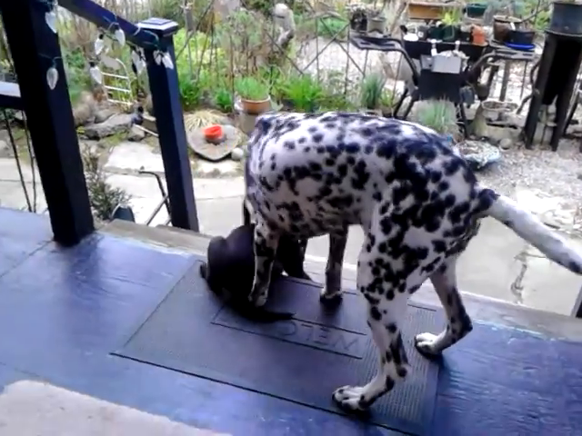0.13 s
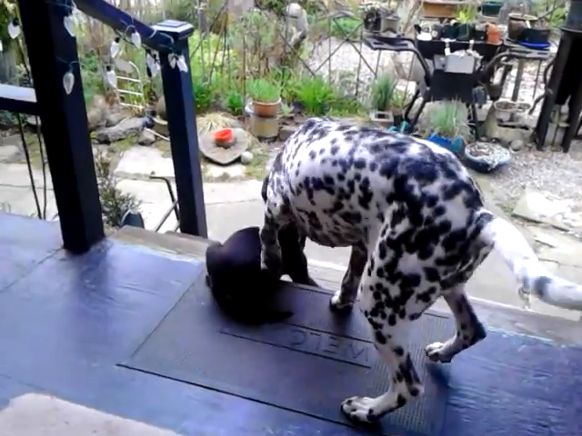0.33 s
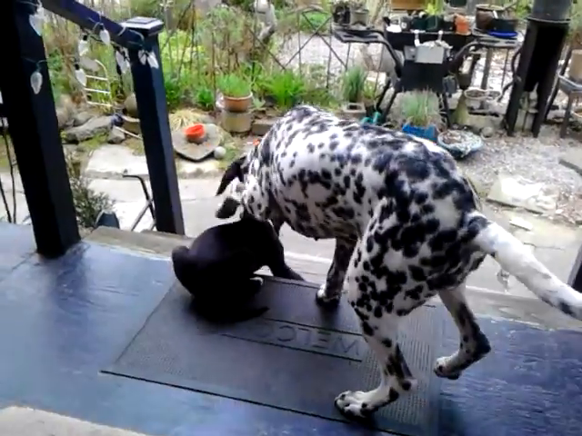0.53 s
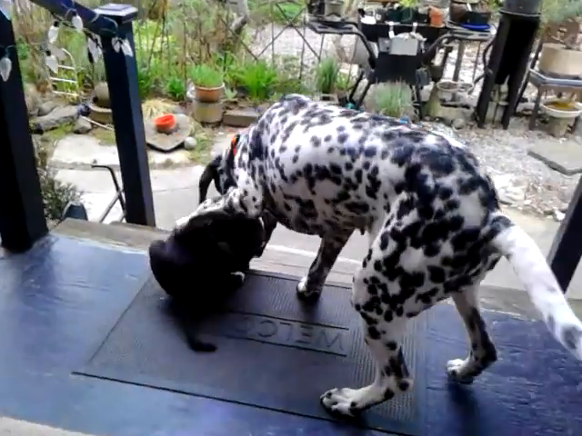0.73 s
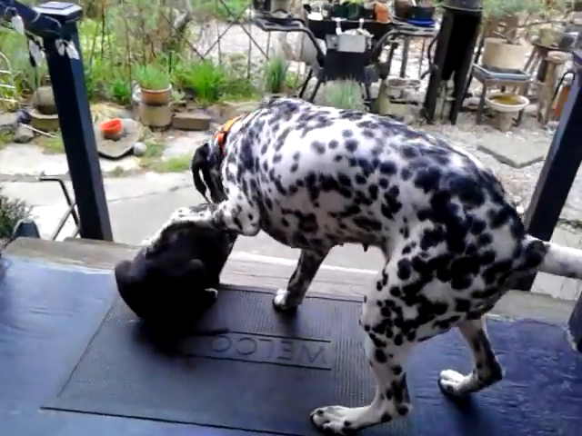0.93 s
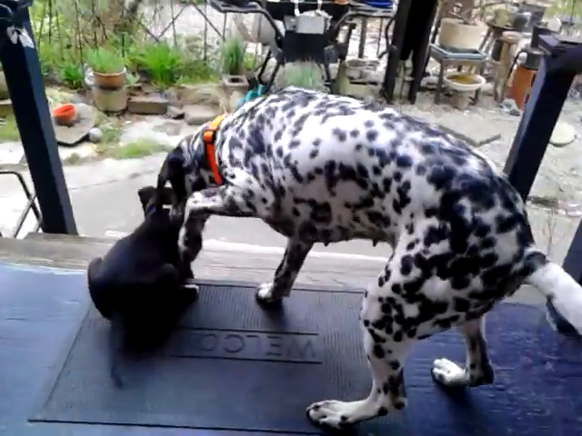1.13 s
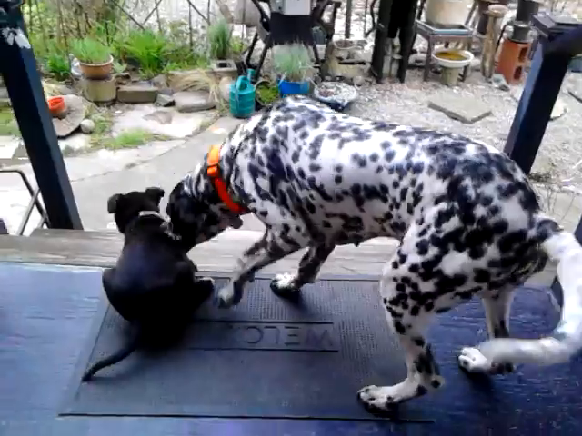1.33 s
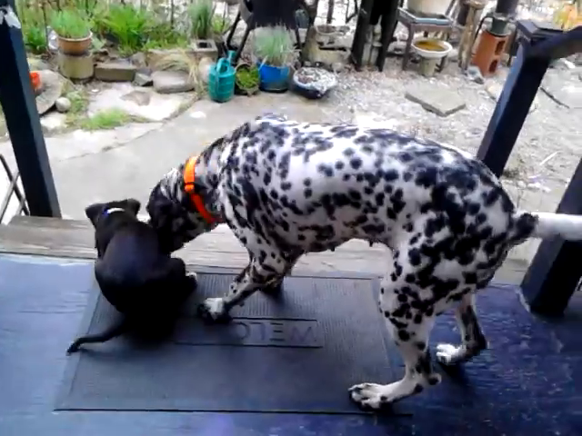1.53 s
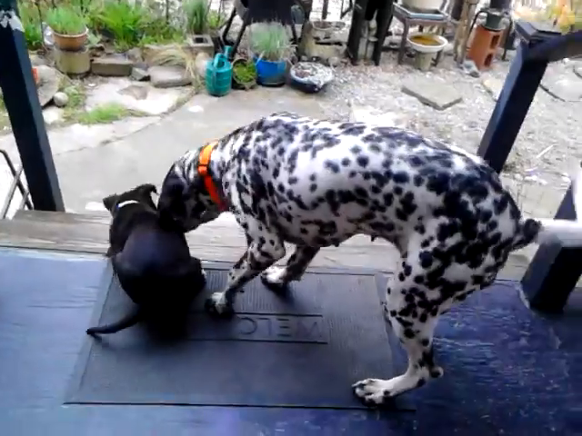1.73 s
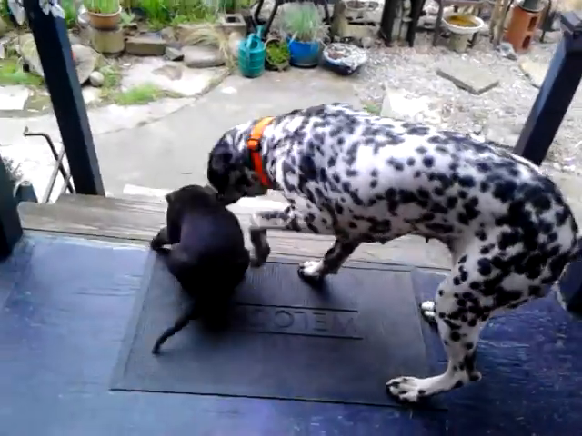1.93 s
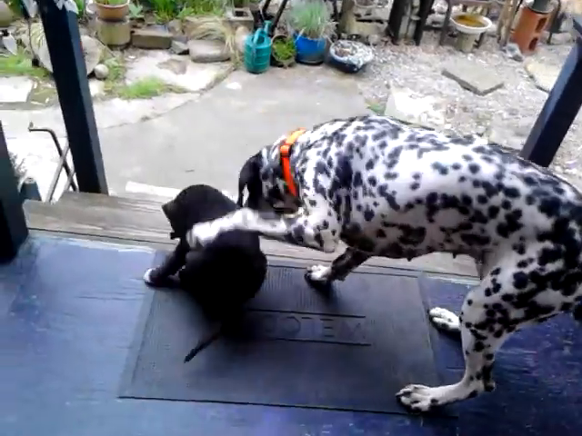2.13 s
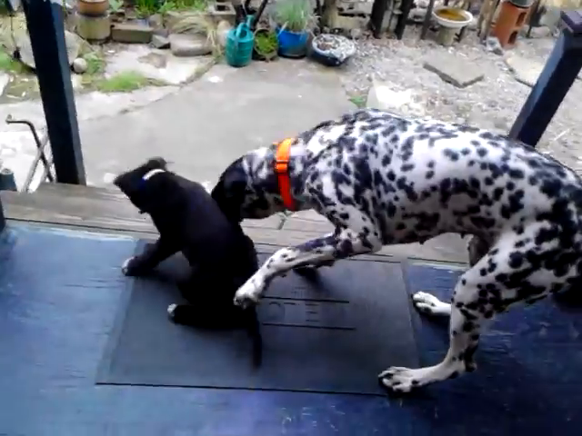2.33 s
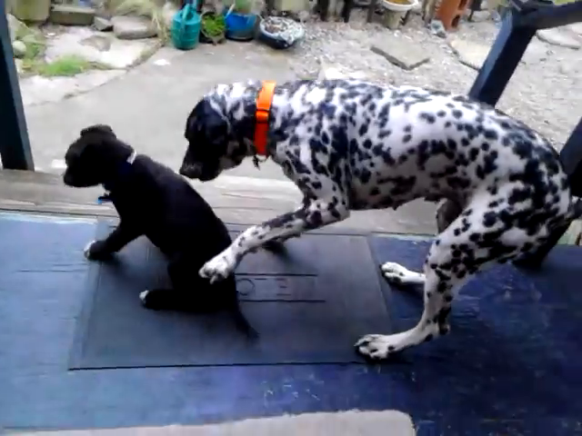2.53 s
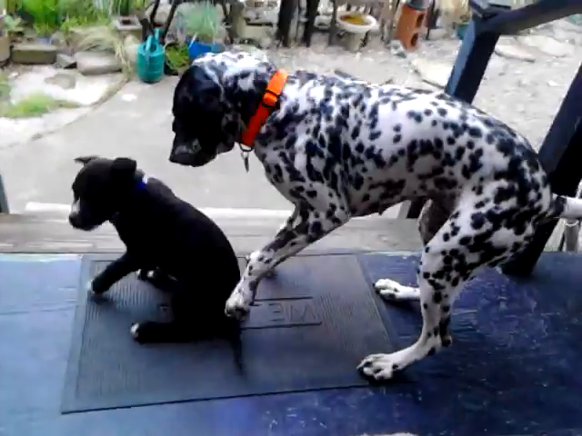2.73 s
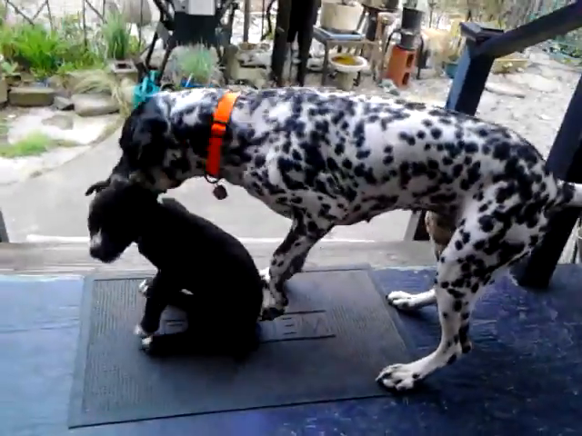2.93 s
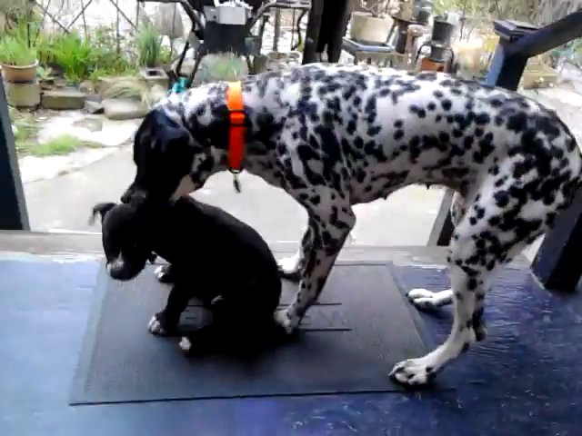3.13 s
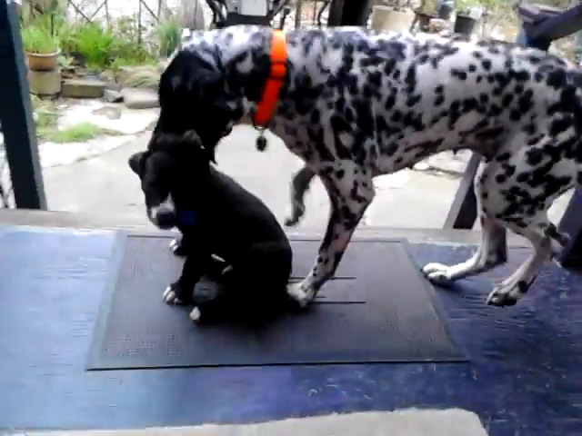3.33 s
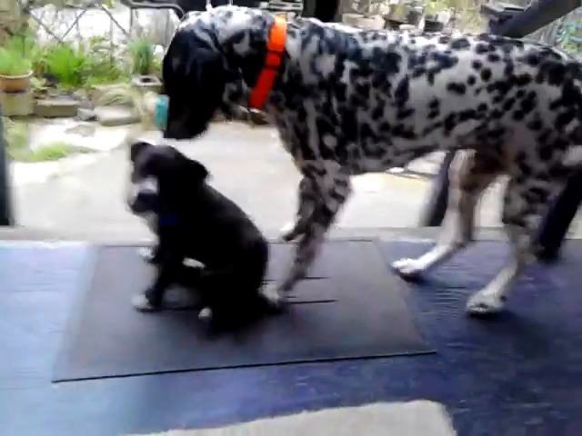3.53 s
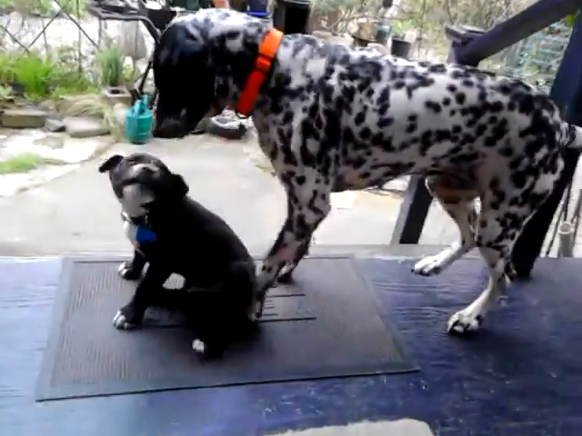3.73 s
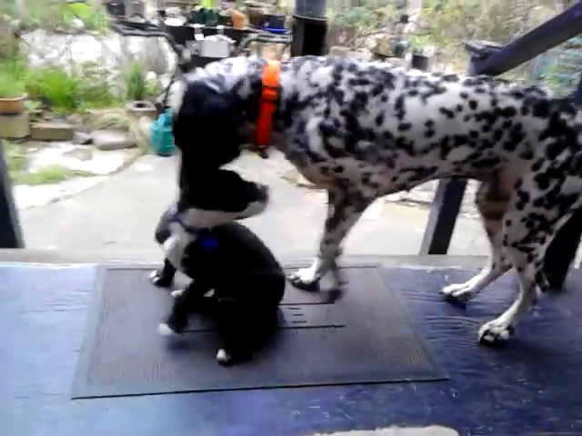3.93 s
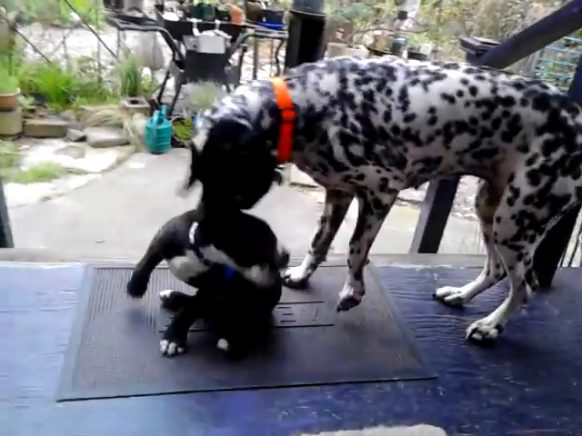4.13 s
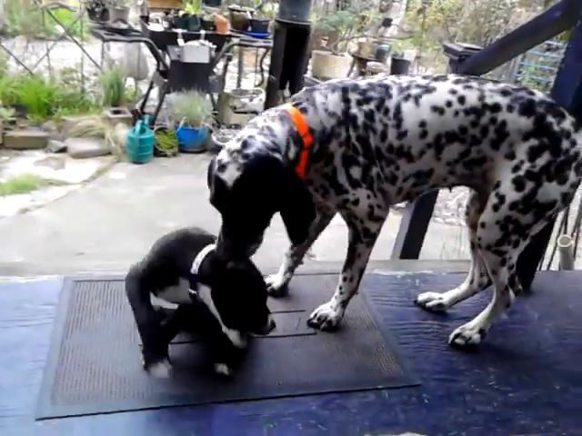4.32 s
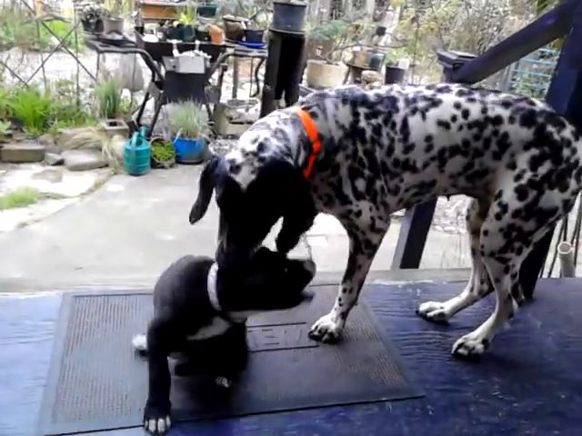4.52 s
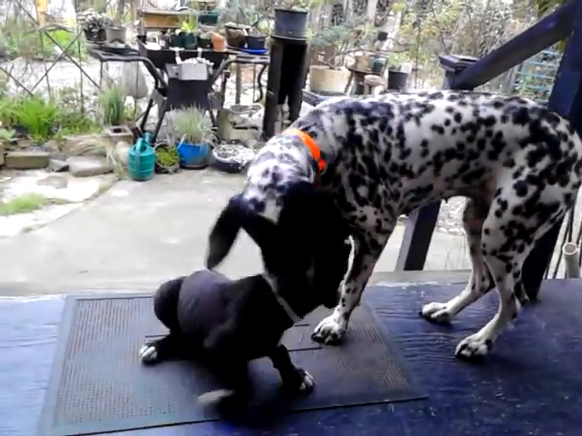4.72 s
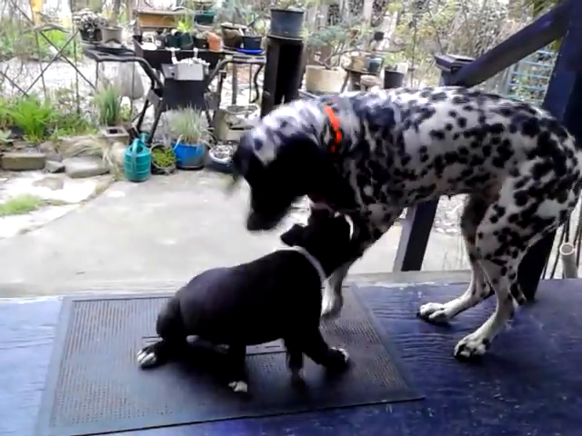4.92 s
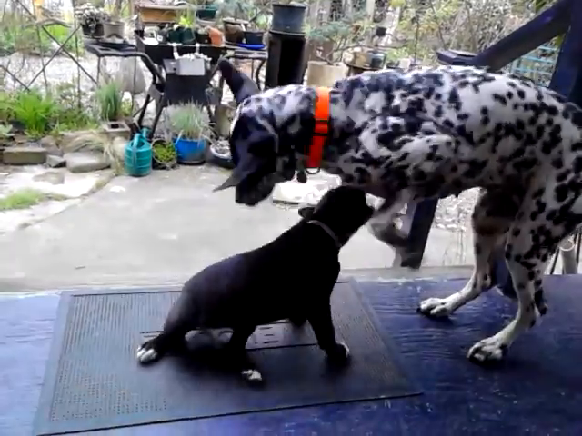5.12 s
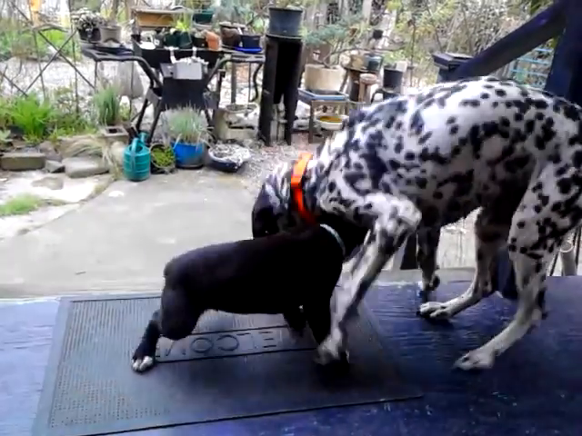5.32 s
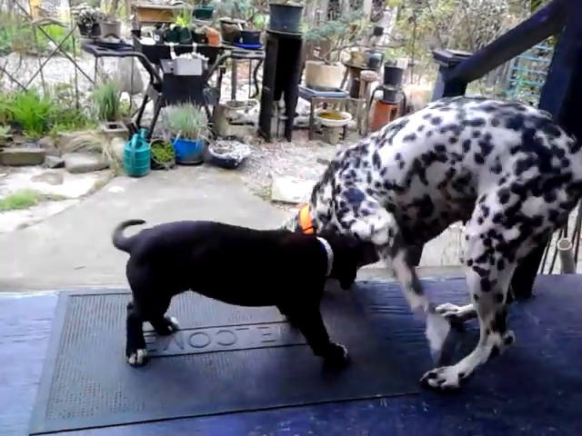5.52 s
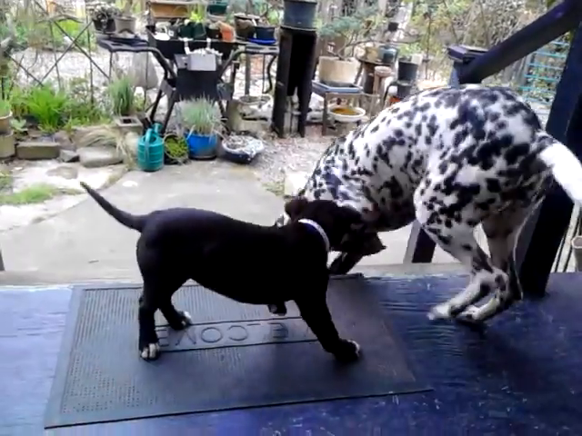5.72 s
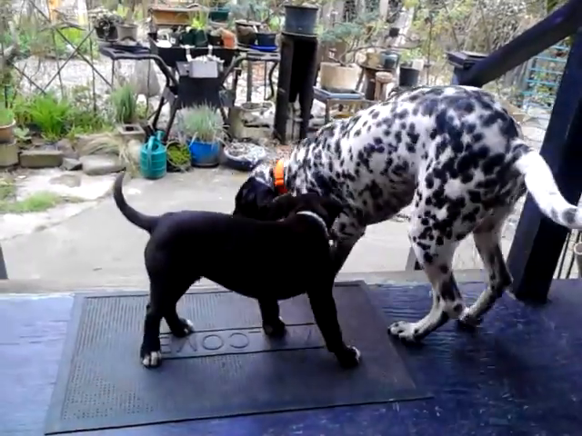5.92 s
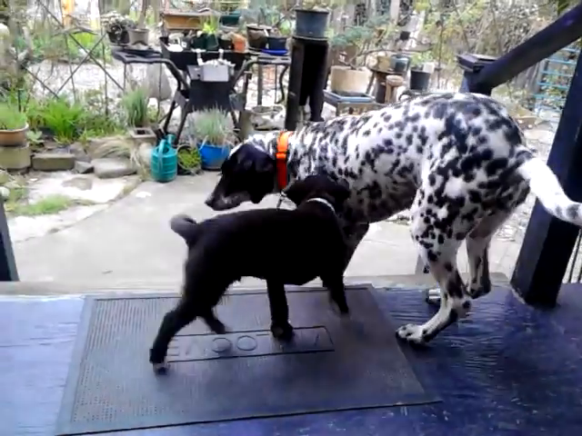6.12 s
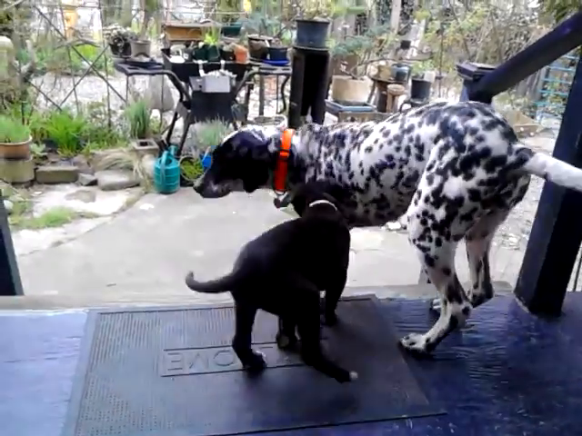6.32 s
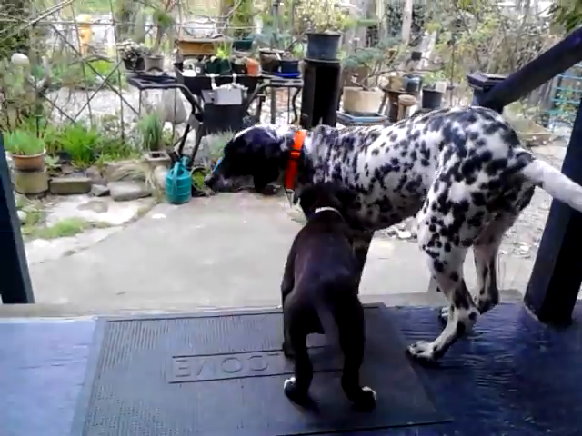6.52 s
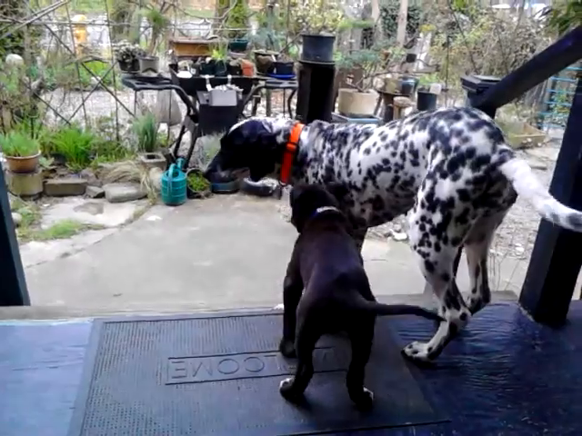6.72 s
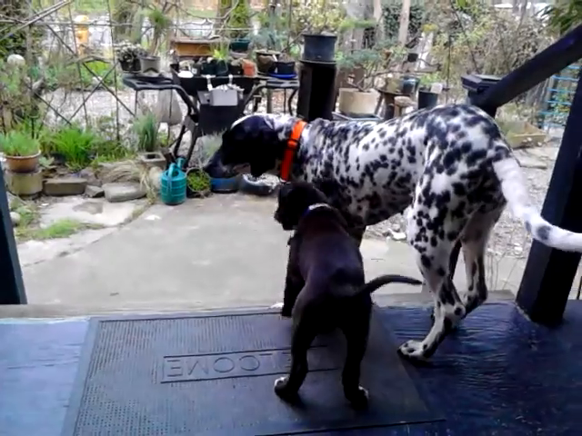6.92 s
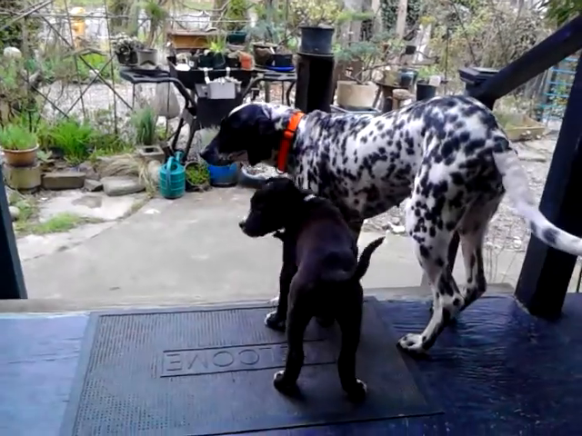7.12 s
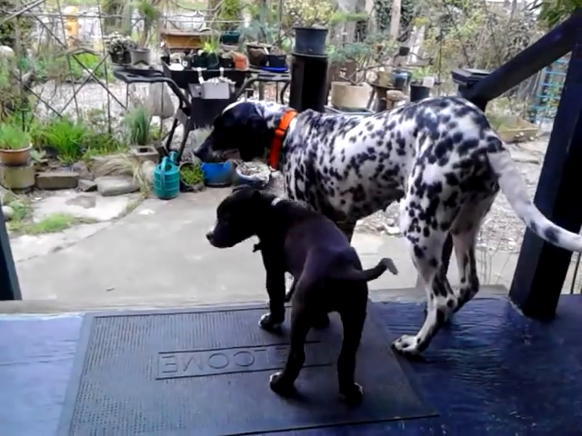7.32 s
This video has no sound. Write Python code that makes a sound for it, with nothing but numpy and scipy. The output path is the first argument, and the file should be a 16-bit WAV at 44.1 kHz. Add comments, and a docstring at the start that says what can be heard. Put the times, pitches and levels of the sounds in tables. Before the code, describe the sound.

Dog claws tick and skid on wooden boards and collar tags clink while a car passes in the background.

```python
"""On a wooden porch, a big dog and a puppy tussle two metres from a phone.
Claws tick and skid on the boards, paws scuff over the doormat and thump on the deck,
and metal collar tags knock and ring. A car passes on the street beyond the yard, with
rushing tyres and a low engine note, over a steady hum and faint outdoor air.
The phone's microphone rings near 5700 Hz, which brightens the air, tyres and scuffs."""
import sys
import numpy as np
from scipy import signal
from scipy.fft import rfft, irfft, next_fast_len
from scipy.io import wavfile
from scipy.ndimage import uniform_filter1d

SR = 44100
rng = np.random.default_rng(int(sys.argv[2]) if len(sys.argv) > 2 else 0)


def master_out(mix):
    """Clip the mix to full scale and print it as 16-bit PCM to the path in sys.argv[1]."""
    frames = np.transpose(np.atleast_2d(mix))
    ceiling = np.clip(frames, -1, 1)
    pcm = np.round(ceiling * 32767).astype(np.int16)
    wavfile.write(sys.argv[1], SR, pcm)


N = 325649

# Firm claw strikes. Each row: start in seconds, relative level in dB, nail pitch in Hz,
# board knock in dB compared with the nail, contact time in milliseconds.
CLAW_STRIKES = [(0.0568, -45.5, 5360, -5, 1.7), (0.0857, -45, 3190, 1, 1.9), (0.102, -41.5, 4760, 12, 1.3),
                (0.5275, -37.5, 6080, -26, 1.6), (0.846, -23.5, 5560, -23, 3.4),
                (1.3282, -39, 5660, -31, 1.9), (1.4062, -28.5, 5750, 0.5, 3.5), (1.472, -36, 5600, -4, 3.2),
                (1.4811, -37, 5940, -3.5, 5.7), (1.5543, -40, 3670, -9, 3.6),
                (1.7649, -39.5, 4020, -26, 2.7), (1.7996, -41.5, 5600, 7, 1.3),
                (2.15, -39.5, 5800, -9, 1.7), (2.158, -38, 5500, -10, 1.5), (2.3382, -35, 5940, -3, 1.4),
                (2.4114, -29.5, 5530, -6, 2.1), (2.6947, -33, 5300, -14, 1.5),
                (3.0275, -28, 4220, -33, 4.1), (3.4505, -16, 5720, -23.5, 2),
                (3.6024, -34.5, 5240, -2.5, 4), (3.7958, -41, 5530, -4, 2.4), (4.1018, -42, 5400, -20, 2.3),
                (4.3098, -33, 5450, -11, 4), (4.3844, -33, 5480, -21, 3.5), (4.6808, -30, 5450, -4, 2.8),
                (5.0305, -31, 5000, -6, 2), (5.254, -14.5, 5220, -23, 1.6),
                (5.4012, -20.5, 5710, -12.5, 2.7), (5.4203, -13.5, 5470, -26, 3.2),
                (5.586, -28.5, 5400, -6, 1.9), (6.114, -19.5, 4950, -14.5, 2.3),
                (6.1187, -22, 3980, -19, 1), (6.529, -32, 5500, -6, 1.25), (6.7291, -45.5, 5500, -6, 1.5),
                (6.8114, -45, 5670, -15, 3.3), (7.1184, -45, 5560, -20, 2.3)]
TYPICAL_STRIKE_DB = -28.5


def undb(db):
    """Turn decibels into a number to multiply by."""
    return 10 ** (np.asarray(db) / 20)


def unit(x):
    """Scale a sound to an average strength (rms) of 1."""
    return x / np.sqrt(np.mean(x ** 2) + 1e-20)


def add(track, start_s, x):
    """Mix a sound into a track at a given time."""
    i = max(int(start_s * SR), 0)
    track[i:i + len(x)] += x[:max(N - i, 0)]


def colour(x, points):
    """Shape a sound's lows and highs along (Hz, dB) points, at strength 1."""
    hz, db = np.transpose(points)
    size = next_fast_len(len(x))
    freqs = np.maximum(np.fft.rfftfreq(size, 1 / SR), 1)
    gain = undb(np.interp(np.log(freqs), np.log(hz), db))
    return unit(irfft(rfft(x, size) * gain, size)[:len(x)])


def band(x, lo_hz, hi_hz, order=1):
    """Keep the part of a sound between two frequencies."""
    return signal.sosfilt(signal.butter(order, [lo_hz, hi_hz], "band", fs=SR, output="sos"), x)


def resonance(x, hz, width_hz):
    """Make a sound ring briefly at one pitch."""
    return signal.lfilter(*signal.iirpeak(hz, hz / width_hz, fs=SR), x)


def wander(per_s):
    """A smooth random curve of strength 1 that turns per_s times a second."""
    step = int(SR / per_s)
    return unit(uniform_filter1d(np.repeat(rng.standard_normal(N // step + 1), step), step)[:N])


def noise(points):
    """Steady noise shaped along (Hz, dB) points."""
    return colour(rng.standard_normal(N), points)


def tone(hz):
    """A pure tone of strength 1 that follows a pitch curve."""
    return np.sqrt(2) * np.sin(2 * np.pi * np.cumsum(hz) / SR)


def swell(middle_s, length_s):
    """A smooth rise and fall around a moment, 1 at the top."""
    return np.exp(-2 * np.minimum(((np.arange(N) / SR - middle_s) / length_s) ** 2, 20))


def fade(t, fade_s):
    """Die away by 60 dB in the fade time."""
    return np.exp(-np.log(1000) * t / fade_s)


def yard(air_db=-57, murmur_db=-66, hum_hz=42.1, hum_db=-57.5, upper_hz=98, upper_db=-71):
    """Faint outdoor air, a deep murmur of distant traffic and a hum of two wavering low notes."""
    # Faint outdoor air, with a thin high hiss from the phone microphone's resonance.
    # Each row: frequency in Hz, relative level in dB.
    air_and_mic = [(70, -10), (140, -21), (250, -20.5), (500, -29), (1500, -59), (3000, -42), (4500, -32),
                   (5750, -31), (7500, -39), (16000, -40)]
    hum = tone(hum_hz * (1 + .025 * wander(12))) * undb(hum_db + 1.3 * wander(10))
    murmur = noise([(20, -10), (33, 0), (55, -6), (70, -3), (110, -14), (200, -35)]) * undb(murmur_db)
    upper = tone(upper_hz * (1 + .016 * wander(5.1))) * undb(upper_db + 2 * wander(3))
    air = noise(air_and_mic) * undb(air_db + .5 * wander(5.3))
    return air + murmur + hum + upper


def tread(hz, width_hz=85):
    """A tyre's tread blocks and the air in their grooves make a narrow, noisy whine."""
    wobble = signal.sosfilt(signal.butter(2, width_hz, fs=SR, output="sos"), rng.standard_normal((2, N)))
    phase = 2 * np.pi * np.cumsum(hz) / SR
    return unit(wobble[0] * np.cos(phase) + wobble[1] * np.sin(phase))


def car(passes_s=5.22, speed_m_s=19, street_m=9.5, tread_hz=845, engine_hz=102.5, drone_hz=68.3):
    """A car drives by: it is louder when near, and its whine and engine drop in pitch as it passes."""
    # Rushing tyres, brightened near 5700 Hz by the phone's microphone, and the low exhaust.
    # Each row: frequency in Hz, relative level in dB.
    tyres_and_mic = [(120, -18), (200, -3.5), (290, -6), (470, -4), (620, -5), (850, -1.5), (1300, -3.5),
                     (1770, -3), (2400, -11), (3200, -18.5), (4500, -18.5), (5600, -10.5), (7500, -30),
                     (16000, -50)]
    exhaust_colour = [(120, -30), (170, 1.5), (220, 7), (290, 2), (360, -8), (500, -42)]
    since_s = np.arange(N) / SR - passes_s
    distance_m = np.hypot(speed_m_s * since_s, street_m)
    near = street_m / distance_m
    bend = 1 / (1 + np.gradient(distance_m) * SR / 343)  # sound travels 343 metres a second
    facing = -speed_m_s * since_s / distance_m
    tyre_gain = undb(-42.5 + .74 * facing) * near  # tyres throw more sound ahead
    far_traffic_gain = undb(-61)
    tyres = noise(tyres_and_mic) * np.hypot(tyre_gain, far_traffic_gain) * undb(wander(14))
    whine = tread(tread_hz * bend) * undb(-45) * near ** 3.6  # beams sideways, so it fades faster
    boom = undb(-48) * swell(4.566, length_s=.56)  # the engine swells on the approach
    engine = tone(engine_hz * bend * (1 + .0048 * wander(13))) * (undb(-61) * near + boom)
    behind = (1 + np.tanh(since_s / .18)) / 2  # the exhaust is heard once the car is past
    rumble = noise(exhaust_colour) * behind * undb(-49.5 - 2 * since_s)
    leaving_drone = tone(drone_hz * (1 + .013 * wander(5.2))) * undb(-52.5) * swell(6.44, length_s=1)
    return tyres + whine + engine + rumble + leaving_drone


def porch(x, echo_s=.0096, echo_db=-20, tail_db=-12):
    """Add to a sound its own copy, an echo off the house wall and a scatter from roof and rails."""
    t = np.arange(SR // 3) / SR
    tail = rng.standard_normal(len(t)) * fade(t, .26) * np.clip(t / .013, 0, 1) ** 2
    response = undb(tail_db) * tail / np.sqrt(np.sum(tail ** 2))
    response[0] += 1
    response[int(echo_s * SR)] += undb(echo_db)
    return x + signal.fftconvolve(x, response)[:N]


def thuds(push_s=.0084):
    """Soft paws put weight on the deck, which booms faintly."""
    # Each row: start in seconds, level in dB, deck pitch in Hz, fade time in seconds.
    landings = [(.6, -48, 337, 0.08), (5.33, -37.5, 211.8, 0.96), (5.41, -44, 52, 0.22),
                (5.42, -46, 203, 0.15), (5.595, -33, 414, 0.13)]
    out, t = np.zeros(N), np.arange(SR // 2) / SR
    push = 1 - np.exp(-t / push_s)
    for start_s, db, hz, fade_s in landings:
        add(out, start_s, undb(db) * np.sin(2 * np.pi * hz * t) * push * fade(t, fade_s))
    return out


def clink(piece, ring_db, bright_db=0, typical_db=-50, tick_s=.0016, graze_hz=28):
    """Knocked metal ticks and rings; the spot struck sets how bright the ring is."""
    # The notes of the small tag, the large tag and the leash loop.
    # Each row: pitch in Hz, relative level in dB, fade time in seconds.
    metal_notes = {"small": [(5760, -8, 0.091), (7815, -3, 0.12), (11000, -8.5, 0.12),
                   (11330, -10.5, 0.071), (15240, -17, .06)], "large": [(9600, -19, 0.24),
                   (12290, -6, 0.13), (12970, -8, 0.23), (14770, -4, 0.14)], "loop": [(4360, -15, 0.2),
                   (4810, -3, 0.13)]}
    # For each piece: the relative level in dB of its tick in a typical clink.
    tick_levels = {"small": -43, "large": -40.5, "loop": -58}
    t, notes = np.arange(SR // 3) / SR, metal_notes[piece]
    tick_db = tick_levels[piece] + .41 * (ring_db - typical_db)  # grows more slowly than the ring
    out = undb(tick_db) * band(rng.standard_normal(len(t)), 7000, 15000) * np.exp(-t / tick_s)
    for k, (hz, note_db, fade_s) in enumerate(notes):
        gain = undb(ring_db + note_db + bright_db * (k - (len(notes) - 1) / 2))
        # The pieces keep grazing each other, which roughens the ring.
        graze = np.cumsum(rng.standard_normal(len(t))) * np.sqrt(2 * np.pi * graze_hz / SR)
        pitch = hz * (1 + .0023 * rng.standard_normal())  # each knock holds the piece differently
        out += gain * np.sin(2 * np.pi * (pitch * t + rng.random()) + graze) * fade(t, fade_s)
    return out


def tags(bounce_s=.0083, bounce_db=-10, neighbour_db=-14):
    """A metal piece on a collar is knocked, bounces once and nudges the large tag beside it."""
    # Each row: start in seconds, piece, relative level in dB, extra dB from each note to the next.
    knocks = [(.100, "loop", -50.5, 3), (.202, "small", -55, 2), (.523, "small", -57.5, -3),
              (.810, "loop", -52, 6), (0.944, "small", -55, 3), (1.414, "small", -54, -6),
              (1.502, "small", -59, 0), (2.216, "small", -68.5, -7.5), (2.34, "small", -66, -9),
              (2.965, "small", -49, 3), (3.029, "small", -46, 3), (3.06, "small", -49, 0),
              (3.831, "loop", -46.5, -4), (4.636, "large", -70, -4), (5.215, "small", -48, 3),
              (5.246, "small", -40, -6.5), (5.265, "large", -51, 2), (5.656, "large", -53, -2),
              (5.696, "small", -40.5, -0.5), (5.702, "small", -43.5, -2), (6.907, "large", -69, -6)]
    out = np.zeros(N)
    for start_s, piece, ring_db, bright_db in knocks:
        add(out, start_s, clink(piece, ring_db, bright_db))
        delay_s = bounce_s * (.5 + rng.random())
        bounce = undb(bounce_db) * clink(piece, ring_db, bright_db)
        neighbour = undb(neighbour_db) * clink("large", ring_db)
        add(out, start_s + delay_s, bounce + neighbour)
    return out


def scuffs(slips_per_s=2500, skid_lag_s=.014, skid_s=.019, drag_board_db=-11, gain_db=-1):
    """Tiny uneven slips make a short skid after each claw strike and longer drags of the paw pads."""
    # Paws dragging on mat and paint. Each row: middle in seconds, length in seconds, relative dB.
    drags = [(0.428, .077, -62.5), (0.629, 0.11, -57.5), (1.03, 0.12, -59), (1.364, .048, -51.5),
             (1.68, 0.087, -63), (2.596, 0.074, -60), (2.799, 0.026, -54.5), (3.066, 0.012, -48.5),
             (3.315, 0.11, -72), (3.484, .025, -52.5), (4.309, 0.023, -49.5), (5.081, .1, -51),
             (5.317, 0.054, -41), (5.519, 0.031, -39.5), (5.609, 0.033, -47), (5.701, 0.022, -44.5),
             (5.89, 0.016, -50)]
    # Scuffing hiss, sharpened near 5700 Hz by the phone's microphone, and the tone of the boards.
    # Each row: frequency in Hz, relative level in dB.
    hiss_and_mic = [(1500, -19), (2800, -10), (4200, 1.5), (5100, 0), (5700, 10.5), (6300, 0.5),
                    (7300, -12), (12000, -20.5), (16000, -30)]
    board_colour = [(200, 12), (600, 0), (1300, 7), (2000, 12), (2600, 2.5), (3500, -24), (8000, -56)]
    slips = (rng.random(N) < slips_per_s / SR) * rng.standard_normal(N)
    slips *= undb(4 * np.minimum(rng.exponential(size=N), 3))  # a few are much stronger
    rubbing = slips + .32 * rng.standard_normal(N)
    hiss, board = colour(rubbing, hiss_and_mic), colour(rubbing, board_colour)
    out = np.zeros(N)
    for start_s, db, _, knock_db, _ in CLAW_STRIKES:
        skid_db = -53.5 + .64 * (db - TYPICAL_STRIKE_DB)
        board_db = -1.5 + .6 * knock_db  # more knock puts more wood tone in the skid
        out += undb(skid_db) * swell(start_s + skid_lag_s, skid_s) * (hiss + undb(board_db) * board)
    for middle_s, length_s, db in drags:
        out += undb(db) * swell(middle_s, length_s) * (hiss + undb(drag_board_db) * board)
    return undb(gain_db) * out


def light_ticks(per_s=12, level_db=-54, edge_db=-19):
    """Nails brush the boards all the time as the dogs shift their weight."""
    out, t = np.zeros(N), np.arange(SR // 100) / SR
    for when, softness, pitch in rng.random((int(per_s * N / SR), 3)):
        force = rng.standard_normal(len(t)) * np.exp(-t / .0034)
        nail = band(force, 4300 + 1200 * pitch, 5600 + 900 * pitch, order=2)
        tick = nail + undb(edge_db) * band(force, 1600, 10700)
        db = level_db - 3 * np.log(softness + .12)
        add(out, when * N / SR, undb(db) * tick / np.abs(tick).max())
    return out


def claws(nail_width_hz=680, shaft_db=-19, gain_db=-1.57):
    """A claw strikes and chatters for a few milliseconds; nail and board ring very briefly."""
    out, t = np.zeros(N), np.arange(SR // 30) / SR
    for start_s, db, hz, knock_db, contact_ms in CLAW_STRIKES:
        force = .4 * rng.standard_normal(len(t)) * np.exp(-(t * 1000 / contact_ms) ** 2)
        force[0] += 1  # the first hit, ahead of the chatter
        nail = unit(resonance(resonance(force, hz, nail_width_hz), hz, 2 * nail_width_hz))
        shaft = unit(band(force, 3200, 4300, order=2))
        board = unit(resonance(band(force, 1400, 2900, order=2), hz=2100, width_hz=900))
        edge = unit(band(force, 7600, 21000, order=2))
        edge_db = -38 - (db - TYPICAL_STRIKE_DB)  # harder strikes have a smaller share of sharp edge
        click = nail + undb(shaft_db) * shaft + undb(knock_db) * board + undb(edge_db) * edge
        add(out, start_s, undb(db + gain_db) * click / np.abs(click).max())
    return out


def scene():
    """The dogs on the porch with the street behind, in one channel."""
    dogs = porch(claws() + light_ticks() + scuffs() + tags()) + thuds()
    return (dogs + car() + yard())[None]


def record(dry, top_hz=16300):
    """The phone cuts off the very highest sounds."""
    return signal.sosfilt(signal.ellip(10, .2, 60, top_hz, fs=SR, output="sos"), dry)


dry = scene()
out = record(dry)
master_out(out)
```